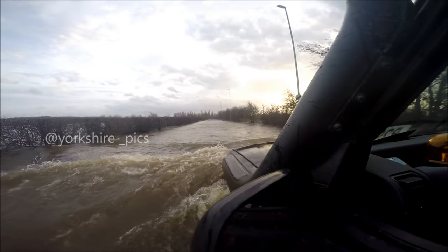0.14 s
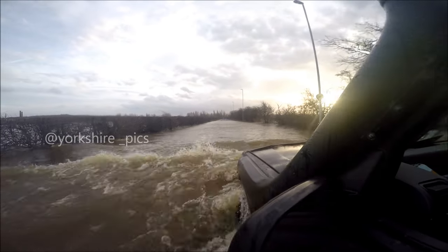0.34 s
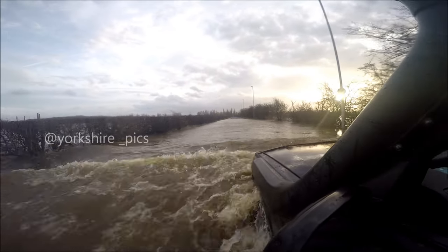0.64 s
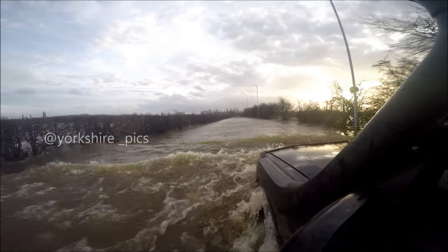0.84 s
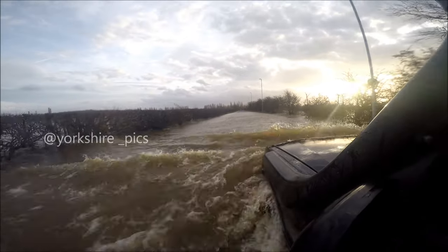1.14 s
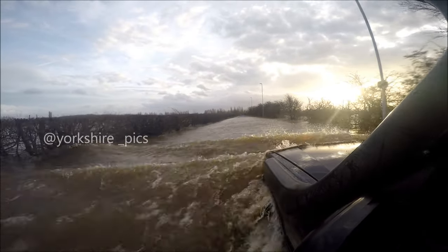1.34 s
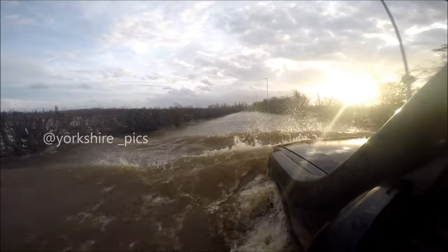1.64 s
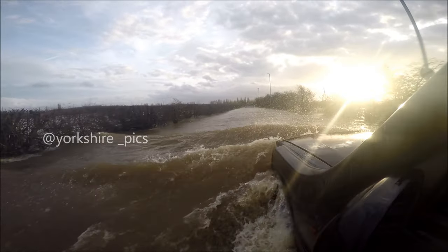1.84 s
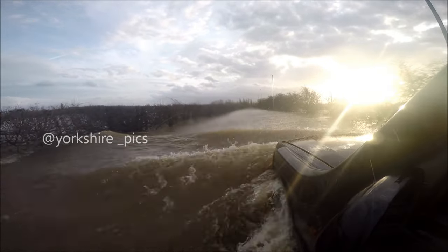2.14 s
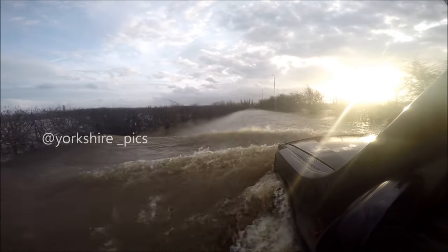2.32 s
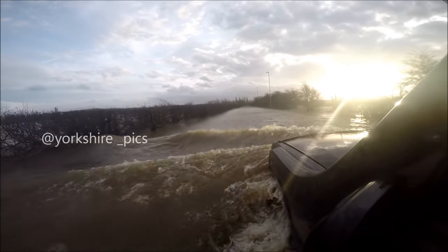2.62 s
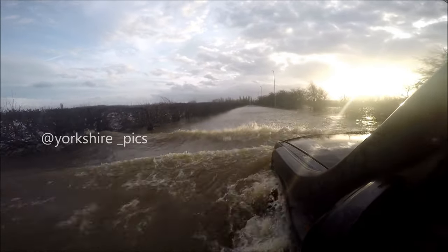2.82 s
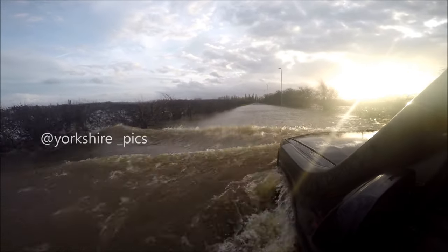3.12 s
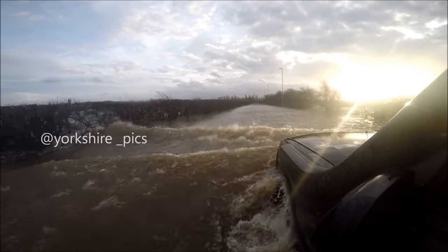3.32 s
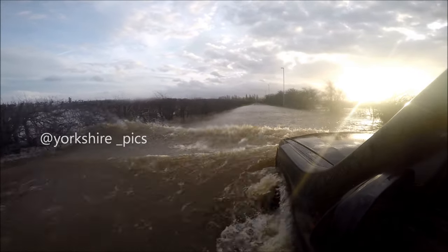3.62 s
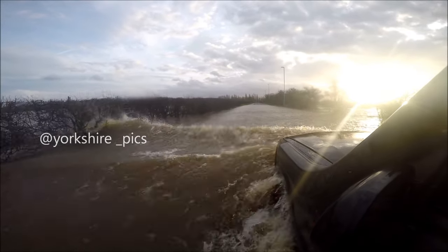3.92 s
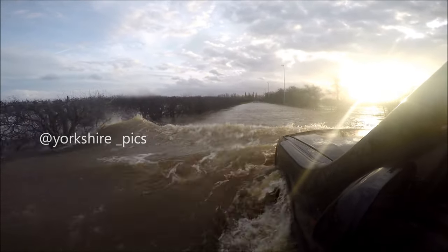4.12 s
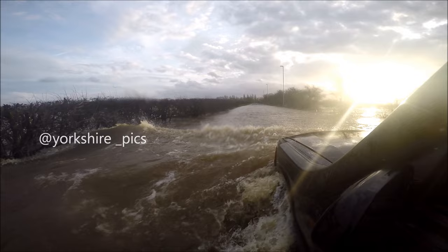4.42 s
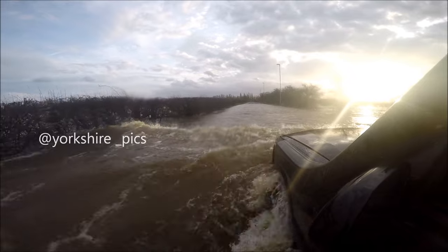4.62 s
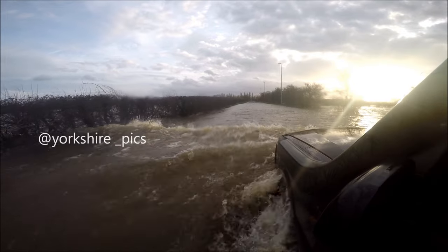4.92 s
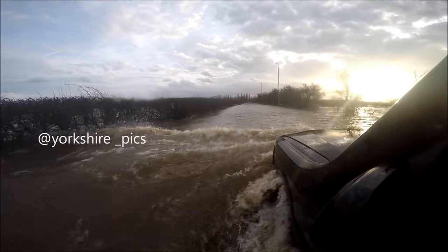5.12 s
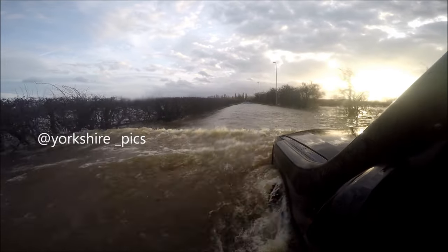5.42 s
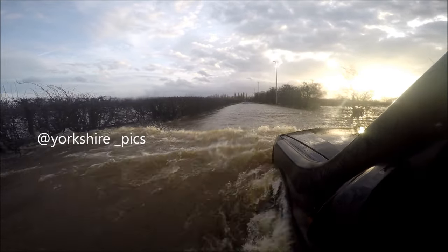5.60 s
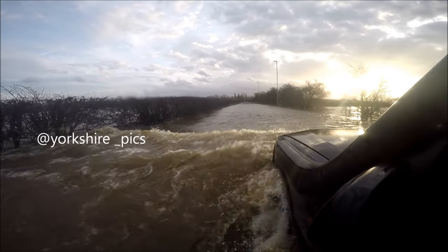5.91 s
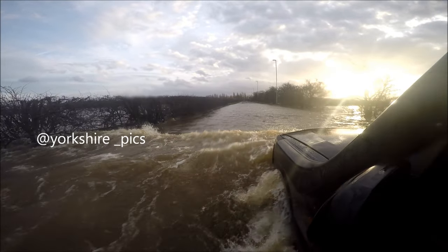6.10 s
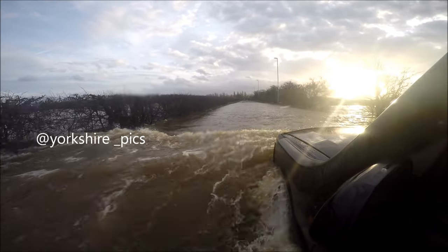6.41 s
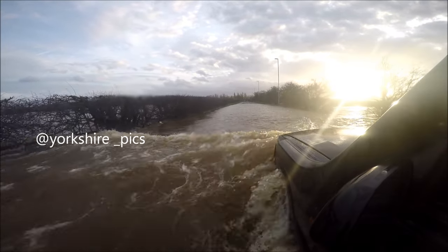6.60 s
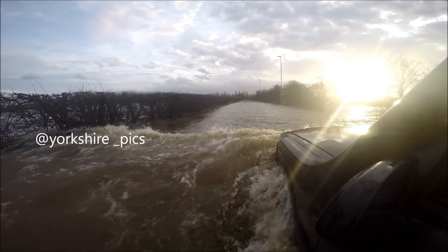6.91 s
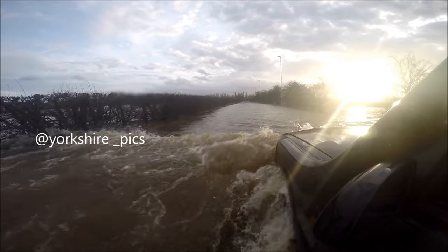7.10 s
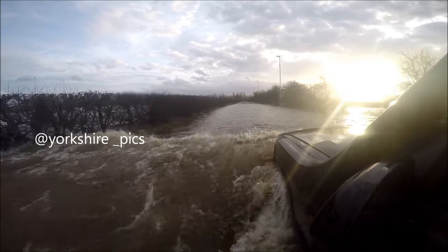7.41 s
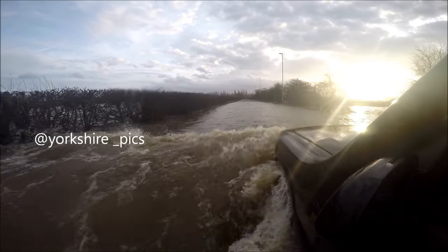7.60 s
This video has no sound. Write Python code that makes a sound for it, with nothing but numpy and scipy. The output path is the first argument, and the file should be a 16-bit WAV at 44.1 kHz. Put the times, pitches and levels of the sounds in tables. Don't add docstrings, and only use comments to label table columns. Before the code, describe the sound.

Strong wind buffets and slaps a small microphone while a vehicle ploughs through deep flood water, its bow wave rushing over a low engine drone.

```python
import sys
import numpy as np
from scipy import signal
from scipy.fft import rfft, irfft
from scipy.io import wavfile
from scipy.ndimage import uniform_filter1d

SR = 44100
rng = np.random.default_rng(int(sys.argv[2]) if len(sys.argv) > 2 else 0)


def dump(signal):
    limited = np.clip(np.atleast_2d(signal).T, -1, 1)
    pcm = np.round(limited * 32767).astype(np.int16)
    wavfile.write(sys.argv[1], SR, pcm)


def volts_from_decibels(level):
    exponent = np.asarray(level, float) / 20
    return 10 ** exponent


N = 341775


def rms_one(x):
    return x / np.sqrt(np.mean(x ** 2) + 1e-20)


def in_time(rows):
    s, *columns = np.transpose(rows)
    return [np.interp(np.arange(N) / SR, s, column) for column in columns]


def band(x, low_hz, high_hz, order=2):
    edges_hz = [low_hz, min(high_hz, 0.45 * SR)]
    return signal.sosfilt(signal.butter(order, edges_hz, "band", fs=SR, output="sos"), x)


def drift(rate_hz):
    r = np.exp(-80 * np.pi * rate_hz / SR)
    slow = signal.lfilter([1], [1, -2 * r, r * r], rng.standard_normal(N // 40 + 2002))[2000:]
    return np.interp(np.arange(N) / 40, np.arange(len(slow)), rms_one(slow))


def resonance(x, hz, width_hz):
    r = np.exp(-np.pi * width_hz / SR)
    zeros = (1 - r * r) / 2 * np.array([1, 0, -1])
    poles = [1, -2 * r * np.cos(2 * np.pi * hz / SR), r * r]
    return signal.lfilter(zeros, poles, x)


def colour(x, spectrum):
    hz, level_db = np.transpose(spectrum)
    log_hz = np.log(np.fft.rfftfreq(N, 1 / SR) + 1)
    return rms_one(irfft(rfft(x) * volts_from_decibels(np.interp(log_hz, np.log(hz), level_db)), N))


def droplet():
    # (time [s], peak level [dB], frequency [Hz], length [ms])
    blip = (2.0385, -27.0, 2620, 2.6)
    s, db, hz, length_ms = blip
    t = np.arange(N) / SR - s
    return volts_from_decibels(db) * np.exp(-(1000 * t / length_ms) ** 2) * np.sin(2 * np.pi * hz * t * (1 + 12 * t))


def whistles():
    # (middle [s], half length [s], level [dB], upper seam [0-1])
    swells = [
        (1.403, .7, -54, 1),
        (2.1, 0.39, -44, 0),
        (5.05, 1, -46, 0),
        (5.5, .4, -58, 1),
    ]
    seams = []
    for hz, width_hz in [(6450, 150), (8360, 80)]:
        once = resonance(rng.standard_normal(N), hz, width_hz)
        seams.append(rms_one(resonance(once, hz, width_hz)))
    t = np.arange(N) / SR
    return sum(volts_from_decibels(db) * np.exp(-((t - s) / half_s) ** 2) * seams[round(upper)]
               for s, half_s, db, upper in swells)


def engine(cycles, boom_db, whine_db):
    orders_db = {4: -18.0, 8: -21, 9: -38, 12: -33, 16: -40, 17: -38, 19: -35.5, 20: -42, 21: -44, 24: -51,
                 28: -32.5, 31: -36, 35: -37}
    drone = np.zeros(N)
    for quarters, db in orders_db.items():
        load_db = boom_db if quarters < 9 else whine_db
        level = np.sqrt(2) * volts_from_decibels(db + load_db + 1.5 * drift(4.3))
        drone = drone + level * np.sin(2 * np.pi * (quarters / 4 * cycles + rng.random()))
    return drone + volts_from_decibels(-34.0) * rms_one(band(rng.standard_normal(N), 100, 237))


def churn(low_hz, high_hz, count, patchy_db, grains_per_s, grain_db, spread_db):
    sizes = volts_from_decibels(spread_db * np.minimum(rng.exponential(1, N), 5)) * rng.choice([-1, 1], N)
    bursting = rng.random(N) < grains_per_s * volts_from_decibels(4.0 * drift(8.0)) / SR
    white = rng.standard_normal((2, N)) + volts_from_decibels(grain_db) * rms_one(sizes * bursting)
    together, edges = drift(2.4), np.geomspace(low_hz, high_hz, count + 1)
    return sum(volts_from_decibels(patchy_db * (0.21 * together + drift(14.3))) * band(white[k % 2], edges[k], edges[k + 1])
               for k in range(count))


def water(cycles):
    # (frequency [Hz], density [dB per Hz])
    rush_spectrum = [(140, -40), (230, -10.5), (341, -4), (463, -5), (751, -2), (962, -8.5), (1620, -17.5),
                     (2070, -25), (2420, -21.5), (3400, -39), (4420, -73), (7480, -120)]
    # (frequency [Hz], density [dB per Hz])
    spray_spectrum = [(2000, -41), (3400, -15), (4050, -8), (4250, -5.5), (4500, 0), (5030, -2), (5420, 1),
                      (7490, -10), (8700, -14), (10200, -12.5), (11400, -19.5), (12900, -18.5),
                      (15000, -20.5)]
    rush = churn(122.5, 4450, count=11, patchy_db=0.57, grains_per_s=1100, grain_db=-16.0, spread_db=2.0)
    spray = churn(2500, 17000, count=7, patchy_db=0.7, grains_per_s=2500, grain_db=-5.0, spread_db=4.8)
    throb = 1 + 0.063 * np.cos(2 * np.pi * cycles)
    return volts_from_decibels(-19) * colour(rush, rush_spectrum) + volts_from_decibels(-33.5) * colour(spray, spray_spectrum) * throb


def door_echo(x):
    lag = SR * 0.000975 * (1.077 + 0.18 * drift(0.35))
    return x + volts_from_decibels(-16.5) * np.interp(np.arange(N) - lag, np.arange(N), x)


def automatic_gain():
    # (time [s], depth [dB])
    ducks = [(0.57, 1), (0.71, 3), (0.85, 5.5), (0.98, 6), (1.2, 6.5), (1.31, 7), (1.65, 6.5), (1.86, 6.5),
             (2.09, 8.5), (2.25, 10.5), (2.38, 11), (2.66, 12.5), (2.83, 12.5), (3.62, 9), (3.78, 8),
             (4.685, 10), (4.8, 10), (4.92, 12), (5.1, 12), (5.62, 7.5)]
    hold_s, recover_db_per_s, attack_s = 0.093, 8.5, 0.08
    t = np.arange(N) / SR
    depths = [np.where(t > s, db - recover_db_per_s * np.maximum(t - s - hold_s, 0), 0) for s, db in ducks]
    return -uniform_filter1d(np.maximum(np.max(depths, axis=0), 0), size=int(attack_s * SR))


def gusts(duck_db):
    # (start [s], length [s],
    # slow pressure [dB], sharpness [dB])
    blows = [(0.546, 0.23, -13, -16), (0.827, 0.11, -14, -11), (0.995, 0.45, -14.5, -9.5),
             (1.611, 0.12, -16.5, -12), (1.802, 0.15, -12, -13), (2.033, 0.24, -14.5, -10),
             (2.362, 0.024, -13, -18), (2.473, 0.059, -16, -12), (2.58, 0.1, -11.5, -25),
             (2.797, 0.034, -18, -6), (2.97, 0.032, -18, -12), (3.283, 0.18, -17, -10),
             (3.454, 0.08, -9.5, -26), (3.566, 0.17, -14, -13), (4.1, 0.23, -15, -10.5),
             (4.519, 0.37, -14, -11.5), (5.056, 0.083, -17.5, -16), (5.185, 0.17, -16, -17),
             (5.56, 0.082, -13.5, -13), (5.742, 0.12, -13.5, -15), (5.93, 0.077, -16.5, -13),
             (6.049, 0.057, -12, -17), (6.317, 0.11, -12, -14), (6.454, 0.15, -19, -7.5),
             (6.676, 0.065, -20, -21), (6.771, 0.39, -14.5, -13), (7.157, 0.06, -18, -12),
             (7.239, 0.079, -15.5, -13), (7.39, 0.057, -11, -10), (7.56, 0.14, -16, -12),
             (4.662, 0.064, -11.5, 0),
        (3.66, 0.068, -15, -7),
        (2.9, 0.039, -22.5, -6),
        (2.27, 0.027, -15.5, -3),
        (0.886, 0.047, -16.5, -5.5),
        (2.665, 0.024, -9, -15),
        (4.83, 0.045, -15, -8.5),
        (5.24, .04, -14.5, -8),
    ]
    rise_db_per_s, fall_db_per_s, lull_db, lull_thump_db = 420, 308, -22, -27
    t = np.arange(0, N, 40) / SR
    s, length_s, db, sharp_db = np.transpose(blows)[:, :, None]
    rise_db = rise_db_per_s * np.maximum(s - t, 0)
    fall_db = fall_db_per_s * np.maximum(t - s - length_s, 0)
    level_db = db - rise_db - fall_db
    layers = level_db, level_db + sharp_db, level_db - 10 + 0.71 * sharp_db
    slow_db, thump_db, flutter_db = in_time(np.transpose([t] + [layer.max(axis=0) for layer in layers]))
    pressure = volts_from_decibels(np.maximum(slow_db, lull_db + duck_db))
    thump = volts_from_decibels(np.maximum(thump_db, lull_thump_db + duck_db))
    return pressure, thump, volts_from_decibels(flutter_db)


def eddies(low_hz, high_hz, even_s):
    x = band(rng.standard_normal(N + SR), low_hz, high_hz)
    x = x / np.sqrt(uniform_filter1d(x ** 2, size=int(even_s * SR)) + 1e-12)
    return rms_one(band(x, 0.75 * low_hz, 1.035 * high_hz)[SR:])


def wind(duck_db):
    pressure, thump, flutter = gusts(duck_db)
    slow = pressure * eddies(14.5, 58.5, even_s=0.09)
    swirl = eddies(64.4, 177, even_s=0.041)
    tilted = signal.lfilter([1], [1, -0.96], eddies(175, 850, even_s=0.0118))
    tearing = 0.61 + 0.86 * np.abs(swirl)
    suction = -0.9 * np.exp(-np.arange(N) / SR / 0.0016)
    return slow + thump * swirl + flutter * rms_one(tilted) * tearing + suction


def slaps():
    # (time [s], crest [dB], width [ms], tear [dB])
    hits = [(0.574, 0.5, 12, -9), (0.718, -0.5, 6.1, -11.5), (0.844, -3.5, 7.5, -17), (1.185, 1, 7.9, -12),
            (1.324, -1, 7.3, -27), (1.442, -1, 7.9, -30), (1.633, 1, 5.9, -30), (1.815, -3, 8.2, -15),
            (1.891, 0.5, 9.5, -19), (2.049, -1.5, 8, -22), (2.104, 0, 7.9, -12.5),
            (2.226, 0.5, 16.4, -15.5), (2.305, 2, 4.9, -12.5), (2.372, -3, 6.2, -20),
            (2.647, -2.5, 5.4, -13), (2.668, 4, 8.7, -14), (2.8, -10, 4.0, -16.5), (3.314, 0, 8.1, -25),
            (3.609, 0.5, 6.8, -18.5), (3.714, -9, 4.8, -16), (4.252, -2.5, 15, -28), (4.673, 2, 5.0, -10.5),
            (4.689, -3, 7.2, -8.5), (4.714, 2, 1.9, -11), (4.734, -3, 5, -15), (4.782, 0, 4.7, -9.5),
            (5.085, -1.5, 7.9, -14), (5.259, 0, 9.1, -17), (5.624, -2, 8.1, -38), (5.809, -2, 5.4, -26)]
    # (time [s], crest [dB])
    taps = [(0.633, -9), (0.66, -8), (1.01, -6), (1.207, -2.5), (1.341, -6), (1.671, -6), (1.837, -5),
            (2.491, -7.4), (2.614, -10), (2.674, -5), (2.862, -11), (2.98, -8), (3.47, -9), (3.594, -3),
            (3.635, -3), (3.673, -5), (4.21, -6), (4.58, -5), (4.862, -5), (5.769, -5.5), (5.967, -6),
            (6.048, -6), (6.335, -8), (6.407, -5.5), (6.903, -10), (7.42, -17), (7.607, -7), (7.65, -7.5)]
    tap_width_ms, tap_tear_below_db = 6.3, -15
    lesser = [(s, db, tap_width_ms, db + tap_tear_below_db) for s, db in taps]
    push, tear, takeover = np.zeros((3, N + SR))
    t = np.arange(-SR // 20, SR // 20) / SR * 1000
    for s, db, width_ms, tear_db in [*hits, *lesser]:
        start = round(s * SR) - SR // 20
        here = slice(start, start + len(t))
        u = t / (0.4 * max(width_ms, 1))
        trough = 0.34 * np.exp(-((u - 2.2) / 2.3) ** 2)
        push[here] += volts_from_decibels(db - 0.5) * (np.exp(-u ** 2) - trough)
        tear[here] += volts_from_decibels(tear_db - 3.0) * np.exp(-((t + 0.84) / 5.8) ** 2)
        takeover[here] += np.exp(-(u / 1.4) ** 2)
    push = signal.sosfilt(signal.butter(1, 14.0, "high", fs=SR, output="sos"), push[:N])
    ripping = eddies(155, 814, even_s=0.0038)
    ripping = ripping + volts_from_decibels(-20.5) * rms_one(band(ripping ** 3, 1280, 3200))
    return push + tear[:N] * ripping, np.minimum(takeover[:N], 1)


def scene():
    # (time [s], firing rate [Hz], load [dB])
    running = [(0, 71.1, -0.5), (.55, 71.7, 3), (.75, 71, -13.5), (1.5, 69.03, -0.5), (2.25, 67.24, -7.5),
               (2.75, 66.13, -3), (3.25, 66.95, 0.5), (3.75, 66.7, -4.5), (4.6, 67.03, 2),
               (5.2, 68.46, -5.5), (5.5, 69.07, 1), (6.3, 71.03, 0), (7.75, 70.98, -0.5)]
    firing_hz, load_db = in_time(running)
    cycles = np.cumsum(firing_hz) / SR
    panel_db = 4 * np.exp(-((firing_hz - 68.8) / 0.71) ** 2)
    whine_db = 0.094 * load_db + panel_db
    duck_db = automatic_gain()
    slap, takeover = slaps()
    port = wind(duck_db) * (1 - 0.7 * takeover) + slap + droplet()
    steady = door_echo(water(cycles)) + engine(cycles, load_db, whine_db) + whistles()
    return (volts_from_decibels(duck_db) * steady + port)[None]


def top_cut(x):
    return signal.sosfilt(signal.butter(12, 15290, fs=SR, output="sos"), x)


def record(dry):
    # (frequency [Hz], width [Hz], level [dB])
    housing = [(758, 220, -4), (4374, 20, 3.5), (4730, 46, -13), (3040, 67, -2), (7420, 200, -7.5),
               (12900, 610, -12)]
    x = dry + sum(volts_from_decibels(db) * resonance(dry, hz, width_hz) for hz, width_hz, db in housing)
    x = x - 0.46 * resonance(x, 8700, 400)
    mix = 0.96 * np.tanh(x / 1.118 + 0.35 * (x / 0.87) ** 3)
    return top_cut(mix)


dry = scene()
out = record(dry)
dump(out)
```